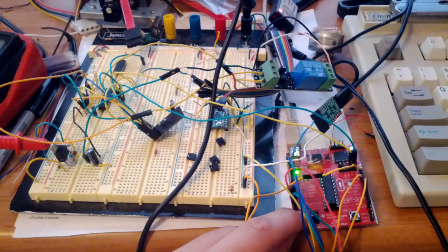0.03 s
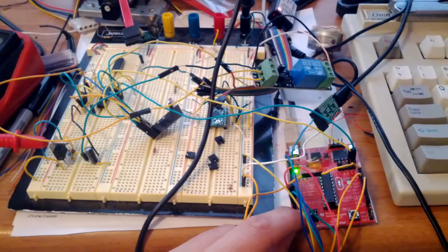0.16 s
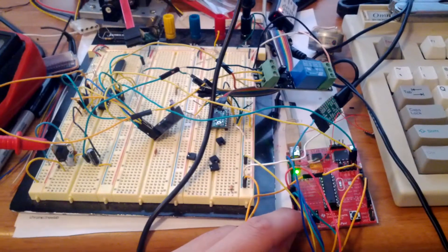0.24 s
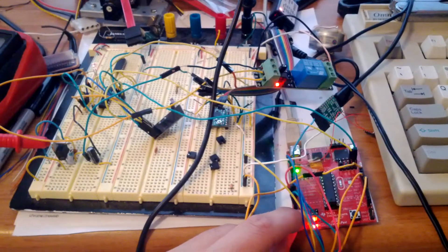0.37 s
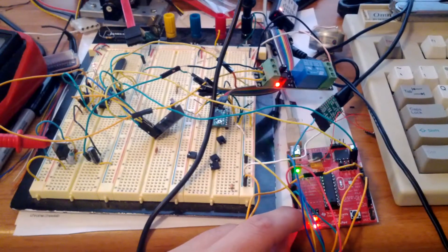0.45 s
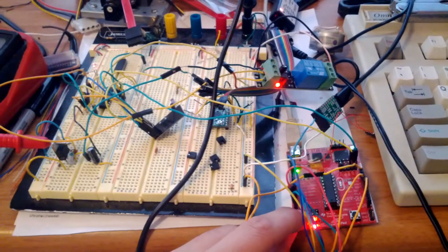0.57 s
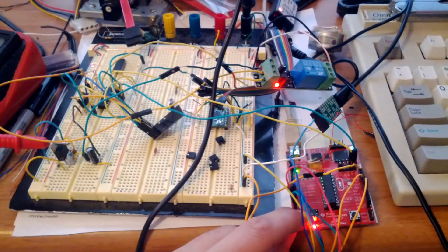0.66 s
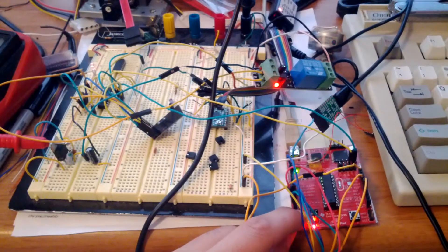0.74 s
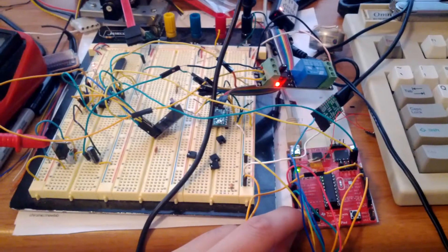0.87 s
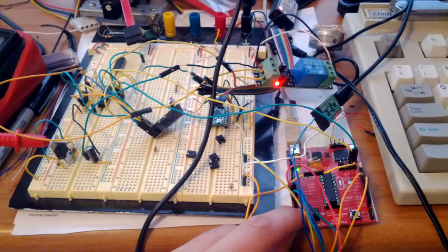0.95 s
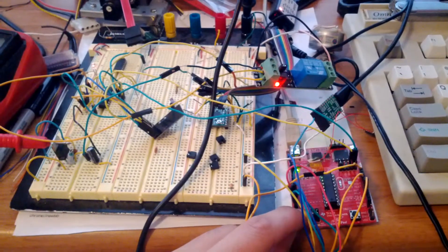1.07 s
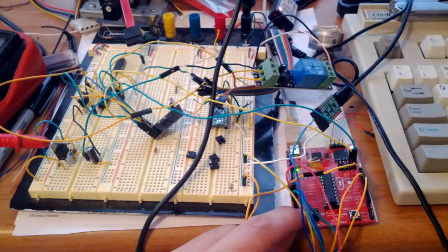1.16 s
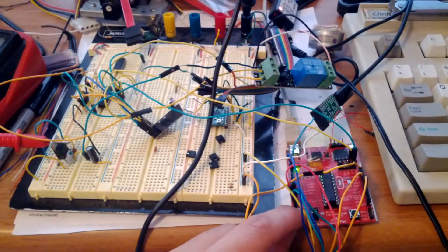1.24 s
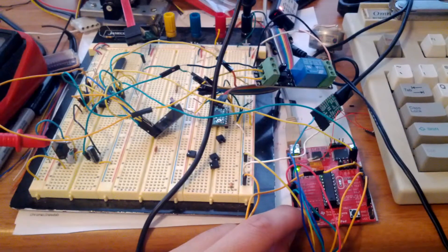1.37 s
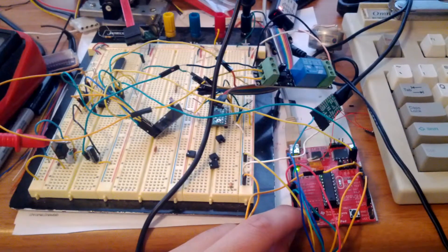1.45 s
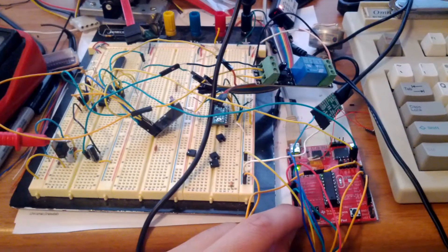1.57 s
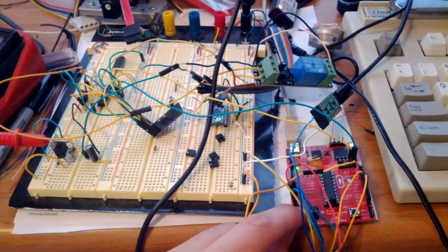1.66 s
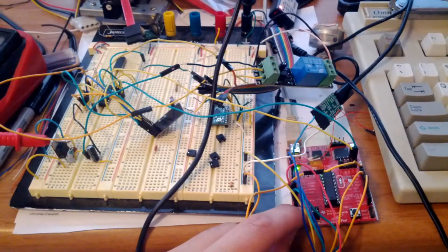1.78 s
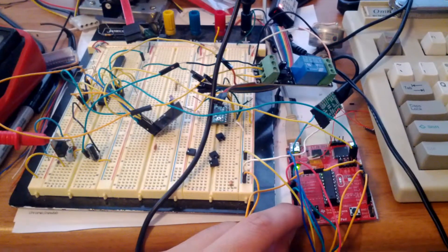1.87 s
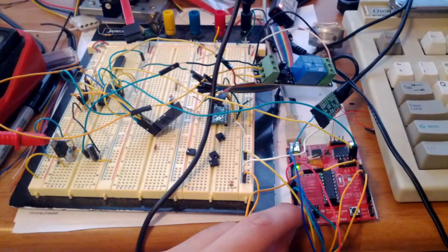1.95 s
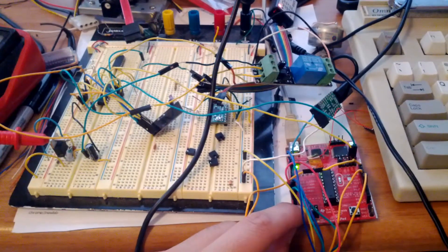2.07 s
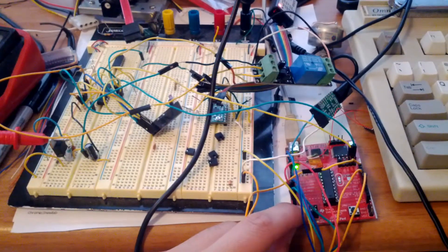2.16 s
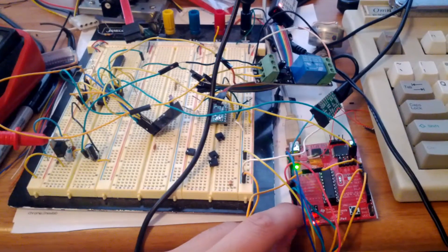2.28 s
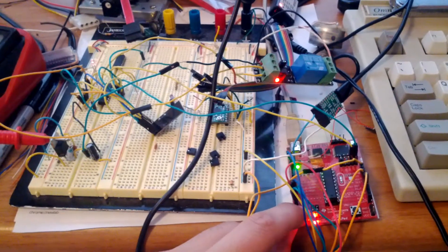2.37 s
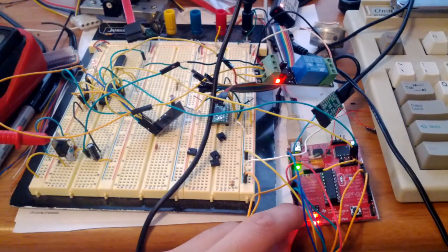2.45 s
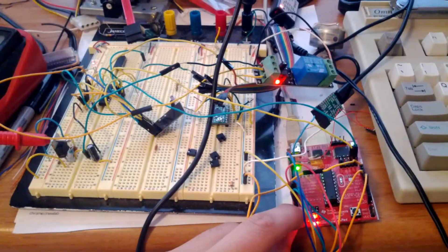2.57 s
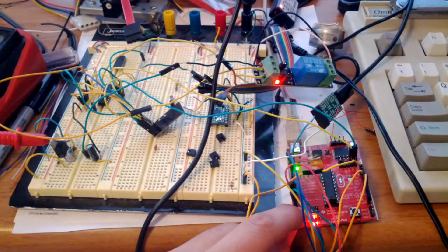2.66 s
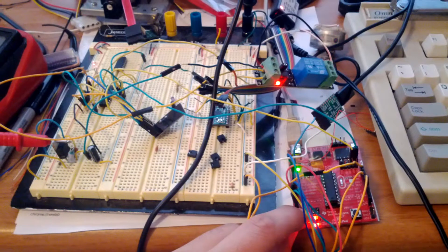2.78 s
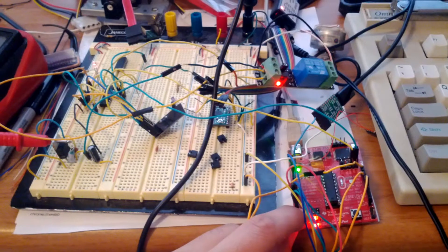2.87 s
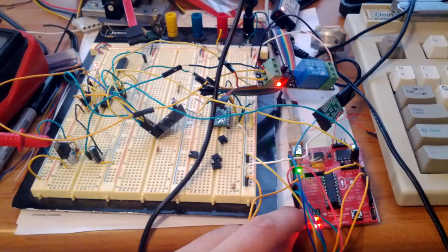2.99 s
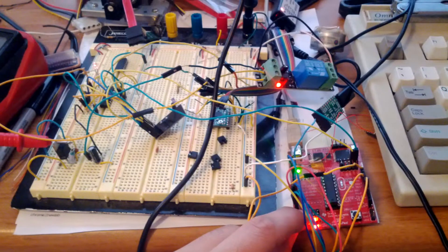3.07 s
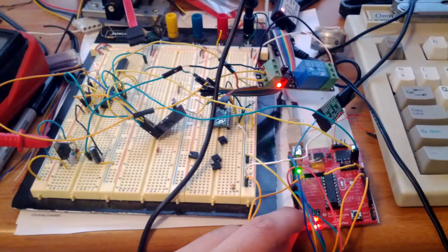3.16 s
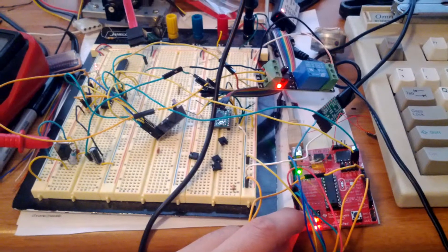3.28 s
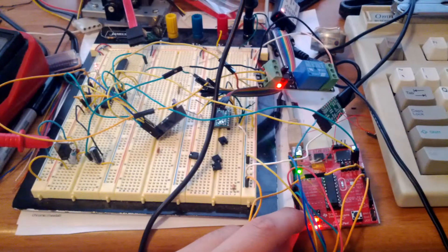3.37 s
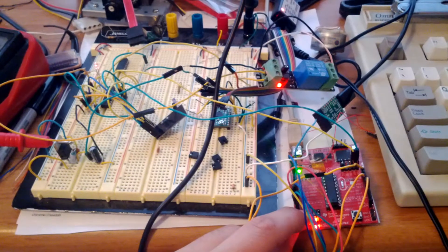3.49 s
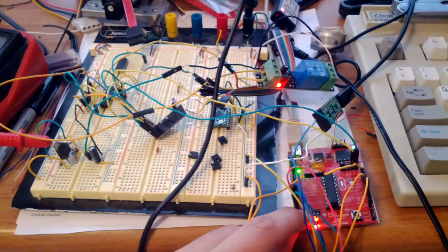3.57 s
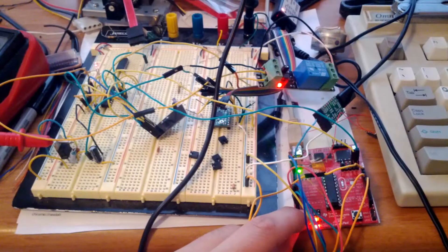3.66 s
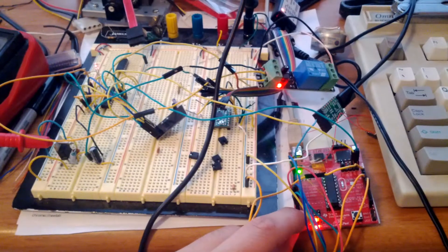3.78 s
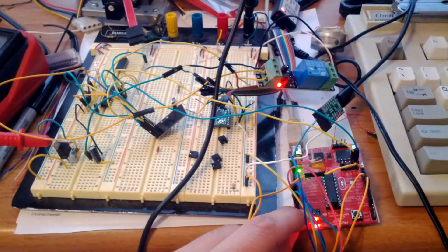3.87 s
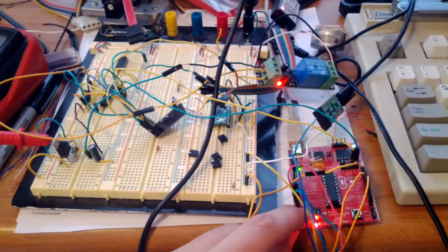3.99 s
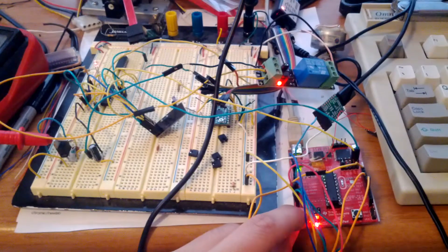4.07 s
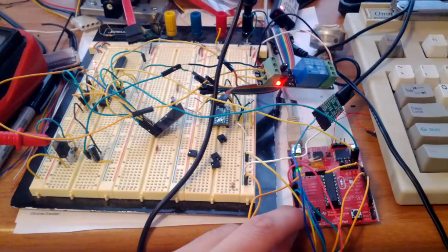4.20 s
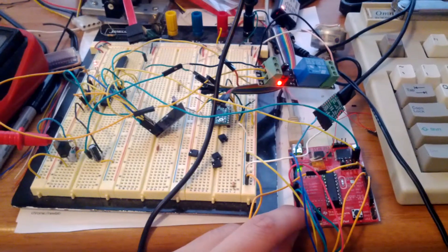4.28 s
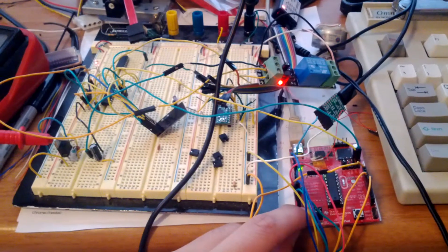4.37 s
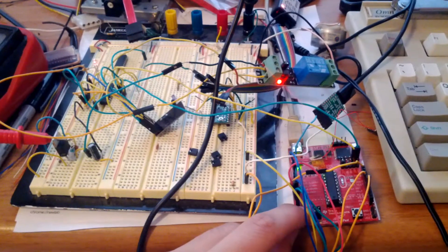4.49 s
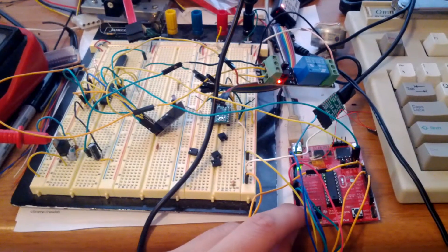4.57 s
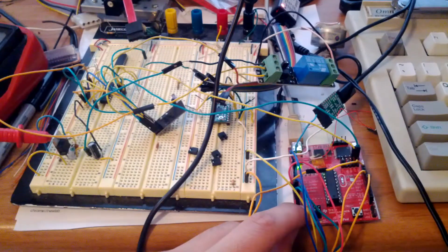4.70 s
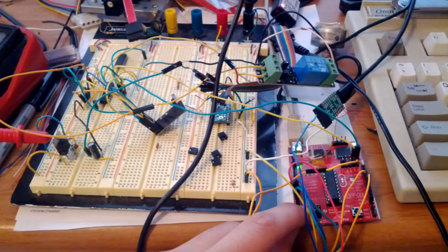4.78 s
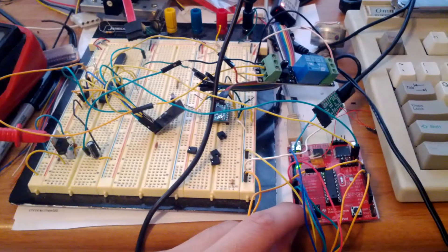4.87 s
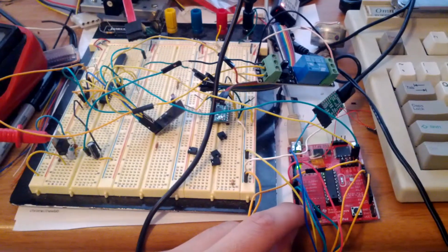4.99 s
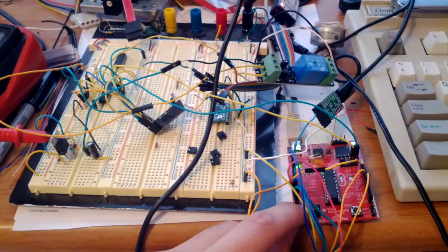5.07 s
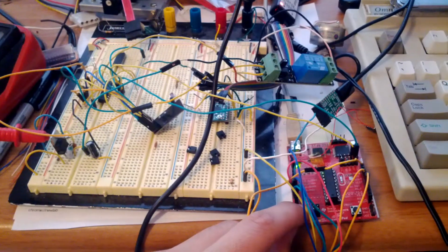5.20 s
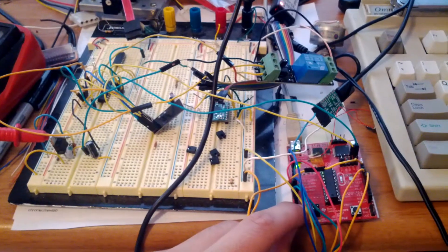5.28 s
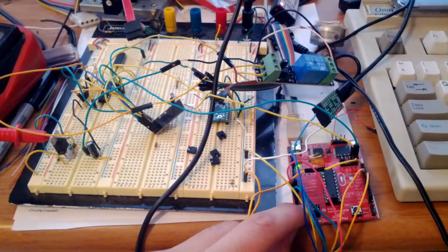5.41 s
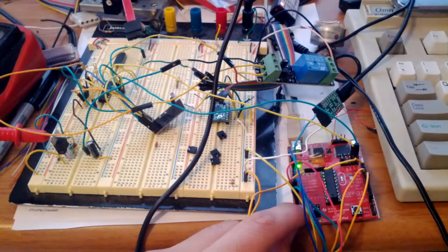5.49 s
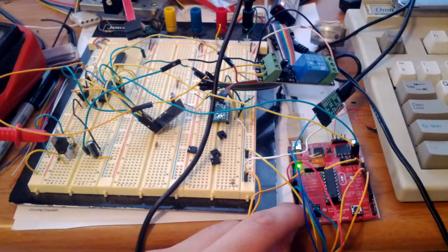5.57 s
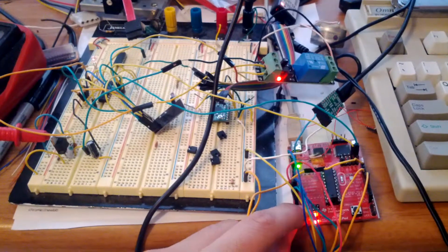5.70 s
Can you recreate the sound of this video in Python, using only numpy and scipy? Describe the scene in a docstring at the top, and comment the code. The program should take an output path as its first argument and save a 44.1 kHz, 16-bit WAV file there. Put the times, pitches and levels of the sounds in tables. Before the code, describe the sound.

Close to the microphone at a workbench, a push button clicks, a relay snaps shut and a small fan motor whirs with fast, fine ticking. The relay drops out with a tiny rattle and the motor coasts down. This happens again with a longer run, and a third start comes at the very end. The small room hums steadily, and a nearby machine adds a low wavering drone partway through.

```python
"""A workbench in a small humming room, heard close up through one microphone. A finger presses a push
button; a moment later a small relay snaps shut and starts a little fan motor, whose brushes tick six
times a turn. Some time after the button is let go, the relay drops out with a rattle and the motor
coasts down. This happens twice, and a third start comes at the very end. Behind the bench, a machine
starts up nearby and adds its wavering drone to the hum."""
import sys
import numpy as np
from scipy import signal
from scipy.fft import rfft, irfft, next_fast_len
from scipy.io import wavfile
from scipy.ndimage import uniform_filter1d, map_coordinates

SR = 44100
rng = np.random.default_rng(int(sys.argv[2]) if len(sys.argv) > 2 else 0)


def transcribe(u):
    """Save the signal u as a 16-bit wav file named by the first command-line argument.

    u: samples, shape (n,) or (channels, n), limited to [-1, 1]; the rate is SR.
    q: integer samples, one column per channel.
    """
    v = np.clip(np.atleast_2d(u).T, -1, 1)
    q = np.round(v * 32767).astype(np.int16)
    wavfile.write(sys.argv[1], SR, q)


N = 253134
TIME = np.arange(N) / SR

# Noise colours, from the back of the room to the bench. Each row: frequency in Hz, relative density in dB.
ROOM_TONE_SPECTRUM = [(12, -16.5), (20, -17.5), (70, -13.5), (96, -12.5), (158, -10), (301, -13),
                      (328, -14), (434, -24), (1370, -30.5), (1710, -32), (1960, -31.5), (2140, -36),
                      (4060, -42), (4420, -41.5), (16000, -40)]
MACHINE_RUMBLE_SPECTRUM = [(70, -9), (110, 0.5), (190, 6), (260, -7), (400, -12.5), (800, -49.5)]
BENCH_THUD_SPECTRUM = [(200, 9), (450, 3.5), (800, -23.5), (1100, -3), (2000, -53), (4000, -20.5)]
BOARD_KNOCK_SPECTRUM = [(500, -7), (900, -6), (1600, -3.5), (1950, -14), (3500, -23.5)]
DOME_SNAP_SPECTRUM = [(700, -11.5), (2000, -3), (3000, -10.5), (4300, -14), (5400, -23.5), (7000, -4),
                      (10000, 6), (14000, 7), (16500, -15.5)]
RELAY_CLOSE_SPECTRUM = [(500, -30.5), (2000, -54.5), (3000, -33.5), (3600, -27.5), (4900, -19), (6100, -23),
                        (6700, -7), (7700, -7), (8400, 1), (9300, 3), (10800, -5), (12000, -3.5),
                        (13200, -17), (14200, -15.5), (16000, -12)]
RELAY_OPEN_SPECTRUM = [(2500, -27.5), (3800, -10.5), (4600, -5), (5200, 11), (6200, 8), (7400, 1.5),
                       (9000, 13.5), (11000, 2), (13000, 2), (16000, -24)]
FAN_AIR_SPECTRUM = [(150, -1.5), (280, -2), (430, -6), (750, -8.5), (1150, -26.5), (1800, -11.5),
                    (2300, -12.5), (2800, -10.5), (3600, -19.5), (6000, -12.5), (9000, -35)]
BRUSH_ON_COPPER_SPECTRUM = [(700, -34), (1300, -22), (1850, -13.5), (2300, -25.5), (2800, -30),
                            (3600, -25.5), (5500, -18), (6600, -17.5), (7050, -6.5), (7450, -12),
                            (8400, -3), (9400, -8.5), (10800, 0), (12600, -5.5), (14100, -7.5),
                            (15100, -24.5)]
# The room's hum. Each row: frequency in Hz, mean level in dB rms.
HUM_TONES = [(28.9, -51.5), (59.5, -56), (120, -64), (161.5, -64), (323, -78.5), (974, -77.5), (2020, -75)]
# The room's decay. Each row: frequency in Hz, t60 in seconds.
ROOM_DECAY = [(300, 1), (3000, 0.66), (9000, 0.27), (15000, 0.15)]
# The machine's drone. Each row: harmonic number, steady level and fluttering level in dB rms.
DRONE_PARTIALS = [(1, -49, -68), (2, -47, -52), (3, -62.5, -68)]
# The button going down or coming up. Each row: start in seconds, snap level in dB, knock level in dB.
BUTTON_MOVES = [(0.3462, -20, -36), (0.703, -21, -42), (2.306, -17.5, -35.5), (4.075, -23, -41.5),
                (5.6112, -20, -35.5)]
# The relay's armature slamming shut and letting go. Each row: start in seconds, level in dB.
RELAY_CLOSINGS = [(0.4034, 1), (2.3628, 1), (5.6676, 1)]
RELAY_OPENINGS = [(1.1537, -14), (4.6149, -14)]
# Its rattle on opening. Each row: delay in seconds, relative level in dB.
CONTACT_BOUNCES = [(0, -4), (.0028, -7), (.0054, 0), (.0088, -8)]
# The motor shifting as it starts. Each row: start in seconds, level in dB.
MOTOR_JOLTS = [(.466, -39), (2.425, -39.5), (5.73, -39)]
# The motor's runs. Each row: power on and power off in seconds, angle at power off in turns,
# full speed in turns per second, air drag time in seconds.
MOTOR_RUNS = [(.403, 1.151, .01, 52.2, 1.895), (2.363, 4.615, .76, 52.27, 1.94), (5.667, 7, 0, 52.2, 1.9)]
# Tones of rotor and blades. Each row: multiple of the turn rate, level at full speed in dB rms.
WHINE_TONES = [(10, -74), (14, -75), (30, -76), (31, -76), (34, -73), (36, -73), (37, -77), (46, -69),
               (52, -72), (56, -76), (104, -67), (106, -72), (115, -71)]
BLADE_TONES = [(6, -73), (7, -58)]
# The commutator's gaps. Each row: place in turns, relative levels of scrape, main spring and top spring
# in dB, gain once coasting in dB, loss at standstill in dB.
COMMUTATOR_GAPS = [(.15, -36, -38, -49, 0, 14), (.335, -32.5, -36, -32, 0, 32),
                   (.477, -32, -27.5, -44, 0, 13), (.667, -32.5, -27.5, -34, 1, 25),
                   (.83, -44, -44, -51, 5, 17), (.95, -36, -35, -42, 1, 28)]
# The low, main and top brush springs. Each row: frequency in Hz, t60 in seconds, attack in seconds.
BRUSH_SPRINGS = [(7830, .016, .0003), (11950, .012, .0003), (13400, .005, .0005)]


def amp(db):
    """Decibels to gain."""
    return 10 ** (np.asarray(db) / 20)


def unit(x):
    """Scaled to rms 1."""
    return x / np.sqrt(np.mean(x ** 2) + 1e-20)


def along(points, hz):
    """(Hz, value) points read on a log axis."""
    knots_hz, values = np.transpose(points)
    return np.interp(np.log(hz + 1), np.log(knots_hz + 1), values)


def step(t, middle, width):
    """A smooth rise from 0 to 1."""
    return .5 + .5 * np.tanh((t - middle) / width / 2)


def wobble(rate):
    """A smooth random curve, rate knots a second."""
    return map_coordinates(rng.standard_normal(512), [TIME * rate], mode="wrap")


def noise(spectrum):
    """Steady coloured noise of rms 1."""
    size = next_fast_len(N + 8192)
    colour = amp(along(spectrum, np.fft.rfftfreq(size, 1 / SR)))
    return unit(irfft(rfft(rng.standard_normal(size)) * colour, size)[:N])


def burst(spectrum, t60, size=4096):
    """One blow on a part with many close, short-lived modes that together follow the spectrum."""
    decay = amp(-60 * np.arange(size) / SR / t60)
    modes = rfft(rng.standard_normal(size) * decay)
    clumps = np.sqrt(uniform_filter1d(np.abs(modes) ** 2, int(3 * size / SR / t60) + 1))
    colour = amp(along(spectrum, np.fft.rfftfreq(size, 1 / SR)))
    cepstrum = irfft(np.log(colour / clumps))
    cepstrum[1:size // 2] *= 2
    cepstrum[size // 2:] = 0  # causal: nothing sounds before the blow
    ring = irfft(modes * np.exp(rfft(cepstrum)))
    return ring / np.linalg.norm(ring) * np.linalg.norm(decay) / 2


def mode(hz, t60, attack, size=2048):
    """One decaying resonance."""
    t = np.arange(size) / SR
    return np.sin(2 * np.pi * hz * t) * amp(-60 * t / t60) * (1 - np.exp(-t / attack))


def strike(times, db, response):
    """The response, started at the given times (between samples too) and levels."""
    at = np.asarray(times)[:, None] * SR
    taps = np.floor(at).astype(int) + np.arange(-7, 9)
    kernel = np.sinc(taps - at) * np.cos(np.pi * (taps - at) / 16) ** 2
    pulses = np.bincount(np.clip(taps, 0, N).ravel(), (amp(db)[:, None] * kernel).ravel(), N + 1)[:N]
    return signal.oaconvolve(pulses, response)[:N]


def room_tone(floor_db=-54, waver_db=2.1):
    """All around the microphone: low noise and a hum whose tones waver slightly."""
    out = amp(floor_db) * noise(ROOM_TONE_SPECTRUM)
    for hz, db in HUM_TONES:
        level = amp(db + waver_db * wobble(3.57))
        out += level * np.sqrt(2) * np.sin(2 * np.pi * hz * TIME + .31 * wobble(5.5))
    return out


def room_reflections(x, echo_db=-19, echo_s=.014, tail_db=-12):
    """What the room sends back to the microphone: one near surface's echo and a short diffuse tail."""
    hz, t, white = signal.stft(rng.standard_normal(SR // 2), SR, nperseg=256)
    tail = signal.istft(white * amp(-60 * t / along(ROOM_DECAY, hz)[:, None]), SR, nperseg=256)[1]
    response = np.pad(tail / np.linalg.norm(tail) * amp(tail_db), (SR // 300, 0))
    response[round(echo_s * SR)] += amp(echo_db)
    return signal.fftconvolve(x, response)[:N]


def machine_drone(start_s=1.7, spin_up_s=.2, full_hz=77.45, rumble_db=-53, flutter_per_s=11):
    """Off the bench, a machine runs up and swells: rumble, a steady fundamental, a fluttering octave."""
    speed = 1 - np.exp(-np.maximum(TIME - start_s, 0) / spin_up_s)
    phase = 2 * np.pi * full_hz * np.cumsum(speed) / SR
    out = amp(rumble_db) * noise(MACHINE_RUMBLE_SPECTRUM)
    for harmonic, tone_db, flutter_db in DRONE_PARTIALS:
        flutter = unit(wobble(flutter_per_s)) + 1j * unit(wobble(flutter_per_s))
        envelope = np.sqrt(2) * amp(tone_db) + amp(flutter_db) * flutter
        out += np.real(envelope * np.exp(1j * harmonic * phase))
    return step(TIME, middle=2.25, width=.13) * out


def bending_waves(x, lag_s=.016, fast_hz=1700):
    """Bending waves in a board: the lower the frequency, the later it arrives."""
    hz = np.fft.rfftfreq(2 * len(x), 1 / SR)
    delay = lag_s * np.clip(np.sqrt(fast_hz / (hz + 1)) - 1, 0, 1)
    return irfft(rfft(x, 2 * len(x)) * np.exp(-2j * np.pi * np.cumsum(delay) * hz[1]))


def push_button(knock, thud, ping_db=-12, thud_db=-4):
    """Close by, the button's dome snaps with a faint ping and knocks the board and the bench."""
    times, snap_db, knock_db = np.transpose(BUTTON_MOVES)
    ping = amp(ping_db) * mode(hz=5030, t60=.0045, attack=.00026, size=4096)
    dome = burst(DOME_SNAP_SPECTRUM, t60=.0094) + ping
    knocks = strike(times, knock_db, knock) + strike(times, knock_db + thud_db, thud)
    return strike(times, snap_db, dome) + knocks


def relay():
    """On the bench, the armature shuts with one hard snap; the contacts rattle as it lets go."""
    times, db = np.transpose(RELAY_CLOSINGS)
    out = strike(times, db, burst(RELAY_CLOSE_SPECTRUM, t60=.011))
    times, db = np.transpose(RELAY_OPENINGS)
    for delay, bounce_db in CONTACT_BOUNCES:
        out += strike(times + delay, db + bounce_db, burst(RELAY_OPEN_SPECTRUM, t60=.014))
    return out


def motor_jolts(thud, hollow_db=-9):
    """The starting motor shifts and gives the bench a hollow nudge."""
    times, db = np.transpose(MOTOR_JOLTS)
    hollow = amp(hollow_db) * mode(hz=739, t60=.051, attack=.004, size=4096)
    return strike(times, db, thud + hollow)


def rotor(on, off, off_angle, full_speed, drag_s, spin_up_s=.046, friction_turns_per_s2=40.3):
    """A quick spin-up, then air drag and bearing friction. Gives turns, share of full speed, power on."""
    rising = full_speed * (1 - np.exp(-np.maximum(TIME - on, 0) / spin_up_s))
    braking = friction_turns_per_s2 * drag_s
    coasting = (full_speed + braking) * np.exp(-np.maximum(TIME - off, 0) / drag_s) - braking
    turning = coasting > .09 * full_speed  # any slower and the magnets catch the rotor
    speed = np.minimum(coasting, rising) * turning
    turns = np.cumsum(speed) / SR
    return turns - np.interp(off, TIME, turns) + off_angle, speed / full_speed, (TIME > on) & (TIME < off)


def fan(motions, air_db=-59, resonance_width=.018):
    """The rotor whines while current flows; the blades hum and stir air as long as they turn."""
    out, air = np.zeros(N), noise(FAN_AIR_SPECTRUM)
    for turns, speed, powered in motions:
        resonance = 1 / np.hypot(1, (1 - speed) / resonance_width)  # the frame sings near full speed
        for multiple, db in WHINE_TONES:
            whine = np.sqrt(2) * np.sin(2 * np.pi * (multiple * turns + rng.random()))
            out += amp(db) * powered * resonance * whine
        for multiple, db in BLADE_TONES:
            out += amp(db) * speed * resonance * np.sqrt(2) * np.sin(2 * np.pi * multiple * turns)
        out += amp(air_db) * speed ** .5 * air
    return out


def gap_crossings(motions, place, even_place, even_at_loss=.6):
    """Each pass of one gap under a brush: time, share of speed lost, seconds since power on and off."""
    runs = []
    for (on, off, *_), (turns, speed, _) in zip(MOTOR_RUNS, motions):
        evenness = np.minimum((1 - speed) / even_at_loss, 1)  # a slow rotor ticks more evenly
        angle = turns - place - (even_place - place) * evenness
        times = np.interp(np.arange(np.ceil(angle[0]), angle[-1]), angle, TIME)
        runs.append([times, 1 - np.interp(times, TIME, speed), times - on, np.maximum(times - off, 0)])
    return np.hstack(runs)


def brushes(motions, fresh_db=-2.5, bedded_db=-1.26, settle_s=.07, scatter_db=.88, grit_fade_db=8):
    """Right at the microphone, each commutator gap flicks the brush springs, softly on a slow rotor."""
    out = np.zeros(N)
    low_spring, main_spring, top_spring = [mode(*spring) for spring in BRUSH_SPRINGS]
    for index, (place, scrape_db, main_db, top_db, coast_db, loss_db) in enumerate(COMMUTATOR_GAPS):
        even_place = .135 + index / len(COMMUTATOR_GAPS)
        times, slowness, since_on, since_off = gap_crossings(motions, place, even_place)
        slip, force = rng.standard_normal((2, 512, 5))[:, :len(times)].transpose(0, 2, 1)
        settled = 1 - np.exp(-since_off / settle_s)  # the brushes settle once the current stops
        db = coast_db * settled - loss_db * slowness ** 3 + scatter_db * force
        bedded = step(since_on, middle=.65, width=.08)  # they bear lightly after a start, then bed in
        contact_db = scrape_db + fresh_db + (bedded_db - fresh_db) * bedded - .8 * slowness
        edge = burst(BRUSH_ON_COPPER_SPECTRUM, t60=.0061)
        grit = burst(BRUSH_ON_COPPER_SPECTRUM, t60=.0056)
        # The gap's edge keeps the tightest time; the grit behind it and the springs are less regular.
        parts = [(edge, 8e-6, contact_db + 7),
                 (grit, 1.2e-4, contact_db + 2 - grit_fade_db * slowness),
                 (low_spring, 2e-5, contact_db - 11 + 2 * bedded),
                 (main_spring, 2.5e-5, main_db),
                 (top_spring, 4e-5, top_db + 5)]
        for part, (response, jitter_s, part_db) in enumerate(parts):
            out += strike(times + jitter_s * slip[part], db[part] + part_db, response)
    return out


def scene():
    """Button, relay and motor up close, room and machine behind, in mono; the clicks echo briefly."""
    motions = [rotor(*run) for run in MOTOR_RUNS]
    clicks = relay()
    knock = bending_waves(burst(BOARD_KNOCK_SPECTRUM, t60=.06))
    thud = burst(BENCH_THUD_SPECTRUM, t60=.11)
    clicks += push_button(knock, thud) + motor_jolts(thud) + brushes(motions)
    return (clicks + room_reflections(clicks) + fan(motions) + room_tone() + machine_drone())[None]


def record(dry, ceiling=.92, top_hz=16050):
    """The recorder rounds the very highest peaks and keeps nothing above its band limit."""
    rounded = dry / (1 + (dry / ceiling) ** 8) ** .125
    size = next_fast_len(N + 8192)
    in_band = np.fft.rfftfreq(size, 1 / SR) < top_hz
    return irfft(rfft(rounded, size) * in_band, size)[:, :N]


dry = scene()
out = record(dry)
transcribe(out)
```